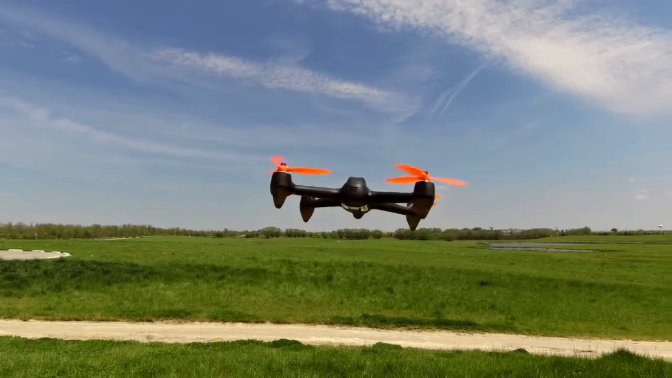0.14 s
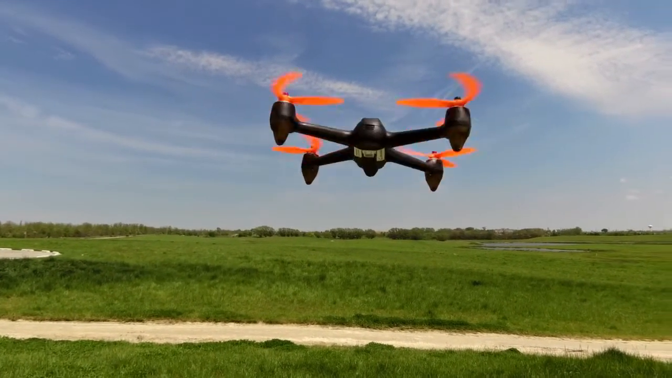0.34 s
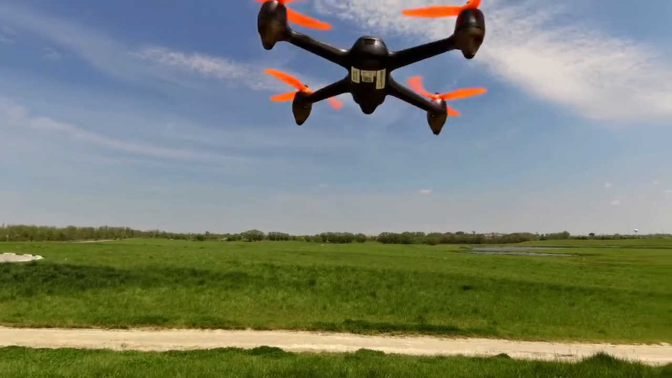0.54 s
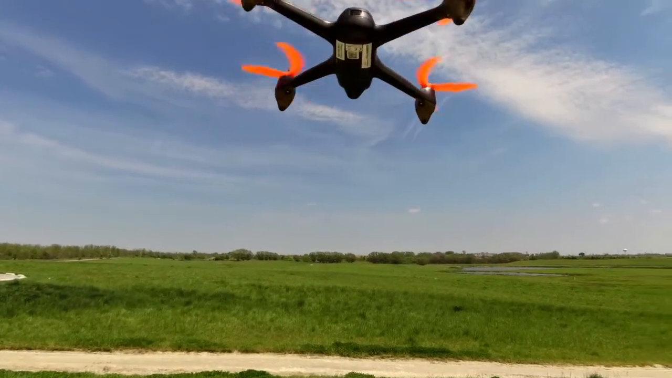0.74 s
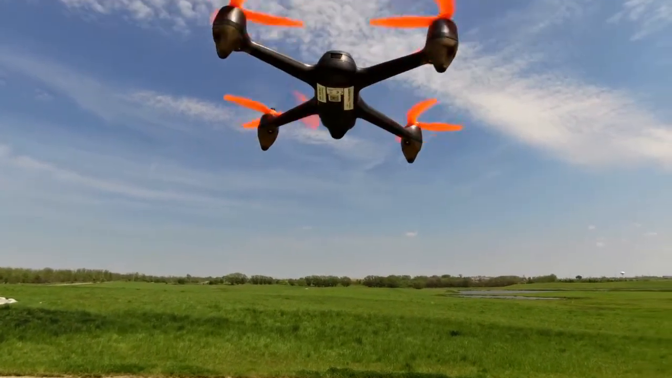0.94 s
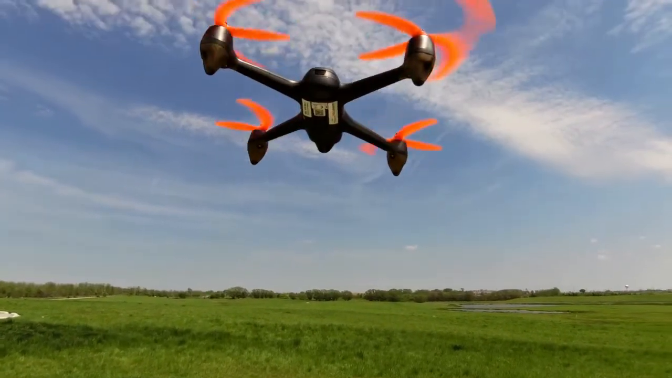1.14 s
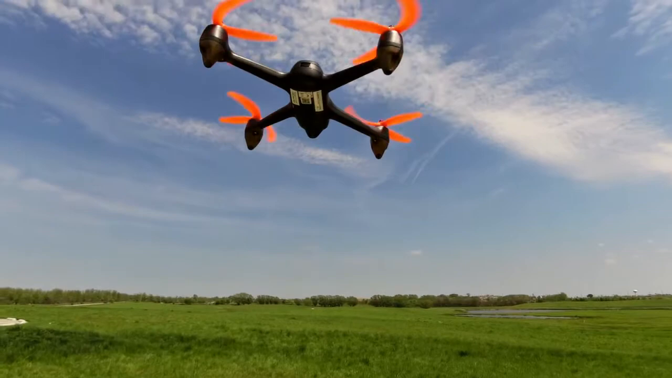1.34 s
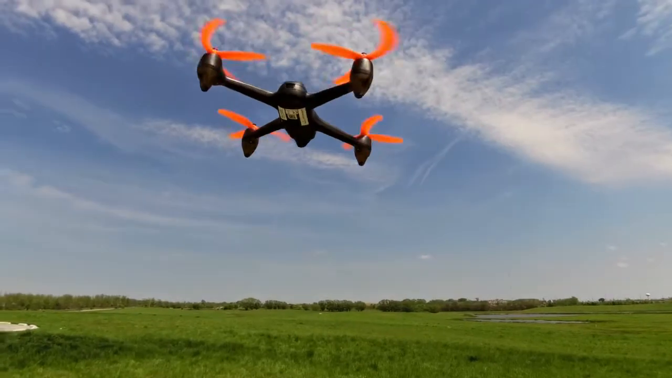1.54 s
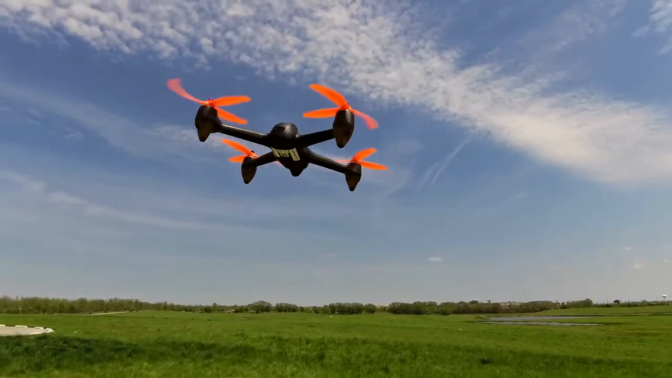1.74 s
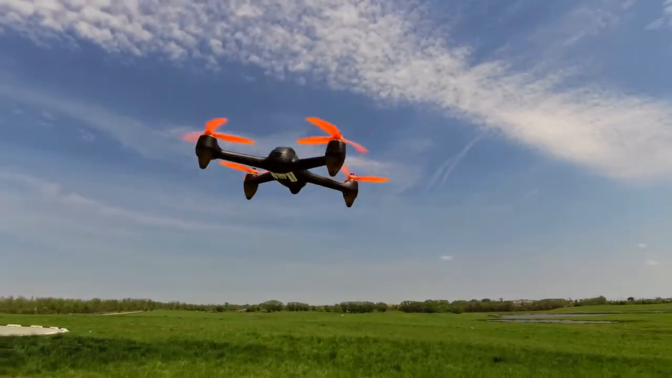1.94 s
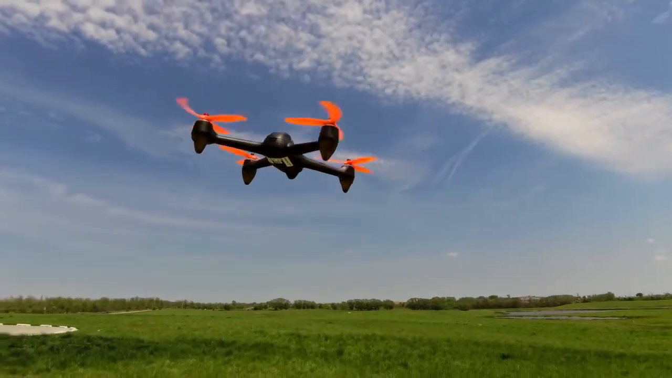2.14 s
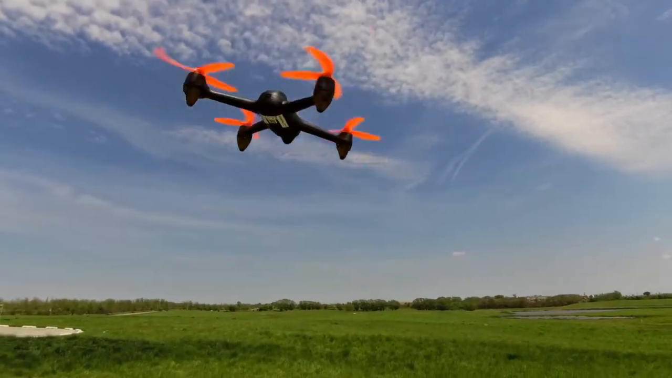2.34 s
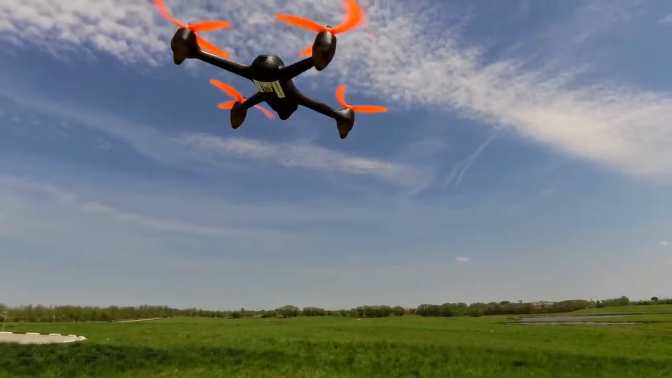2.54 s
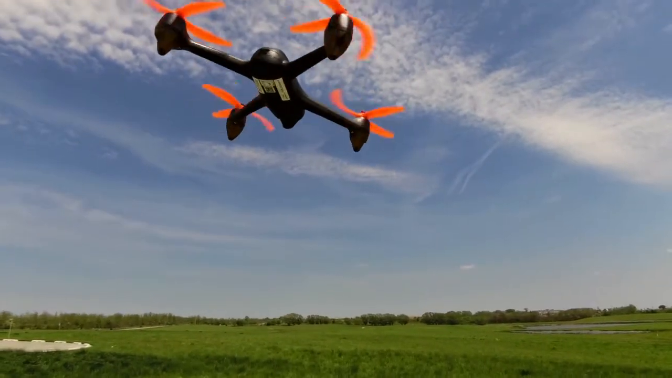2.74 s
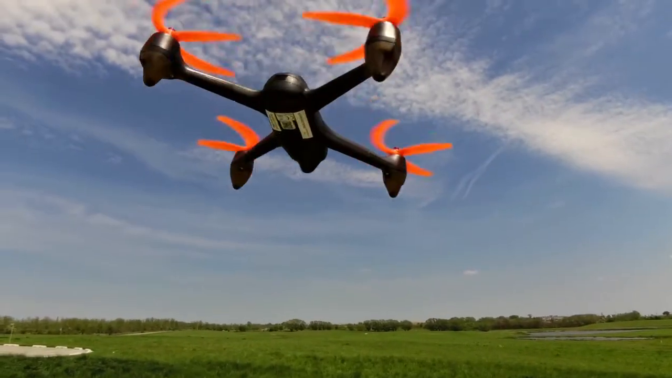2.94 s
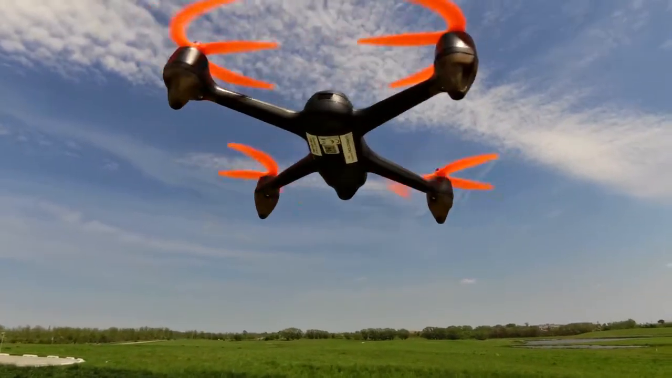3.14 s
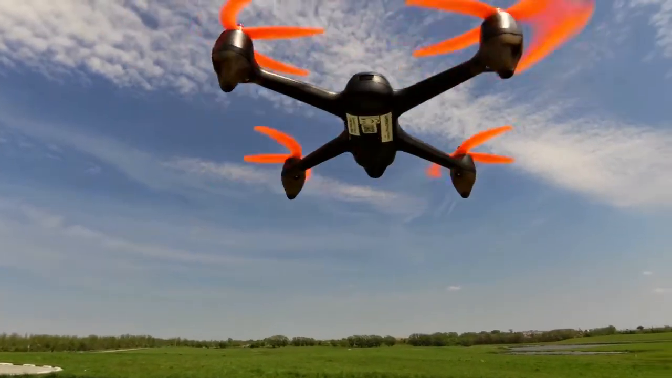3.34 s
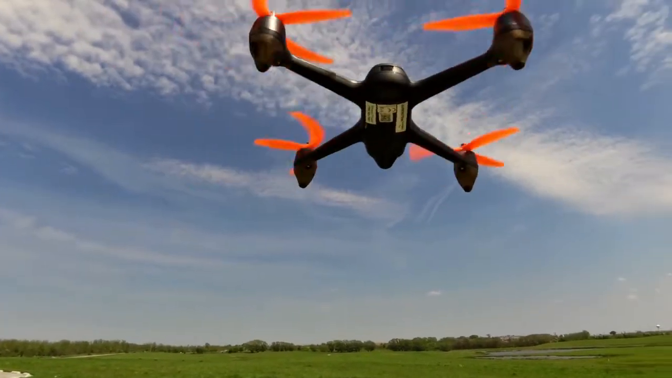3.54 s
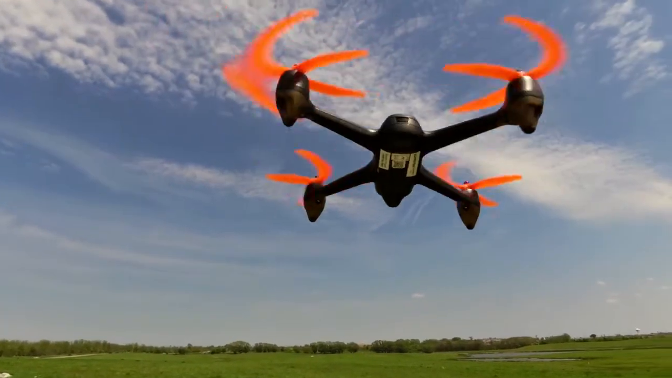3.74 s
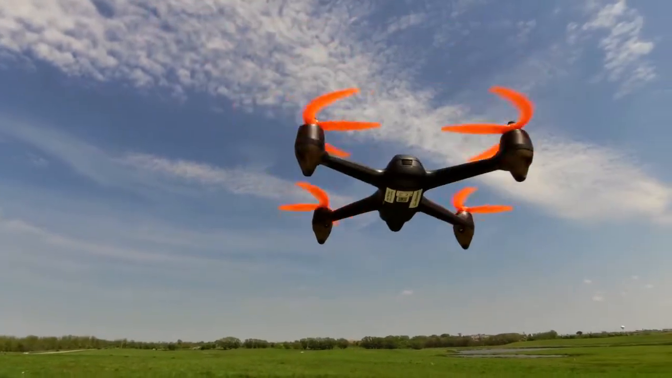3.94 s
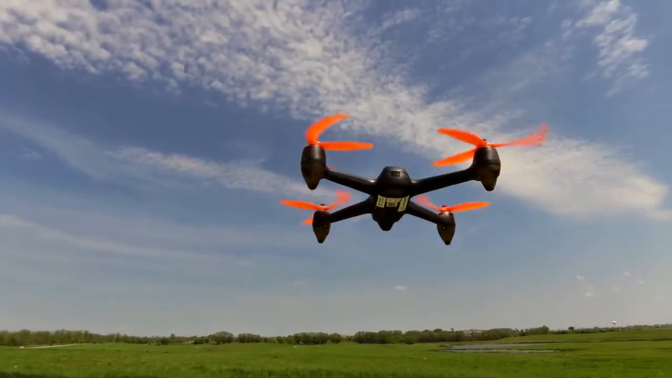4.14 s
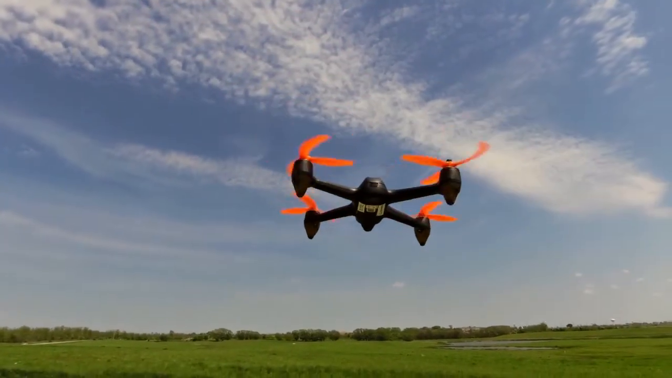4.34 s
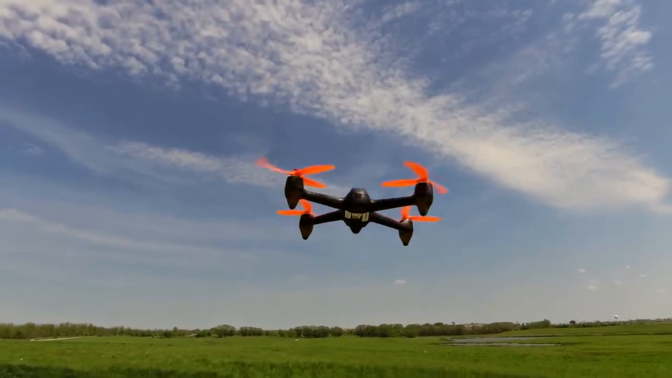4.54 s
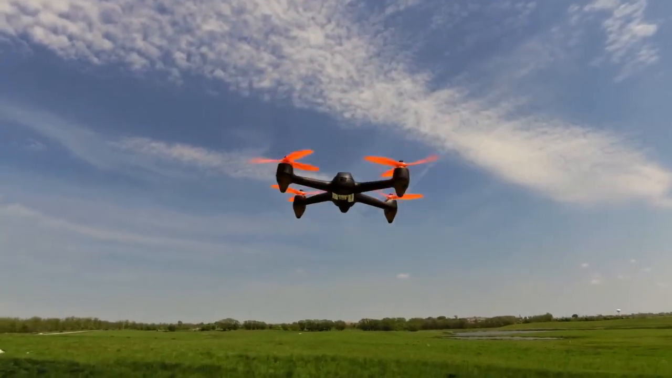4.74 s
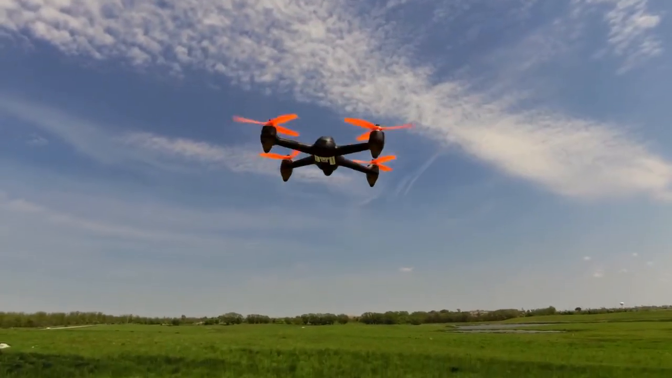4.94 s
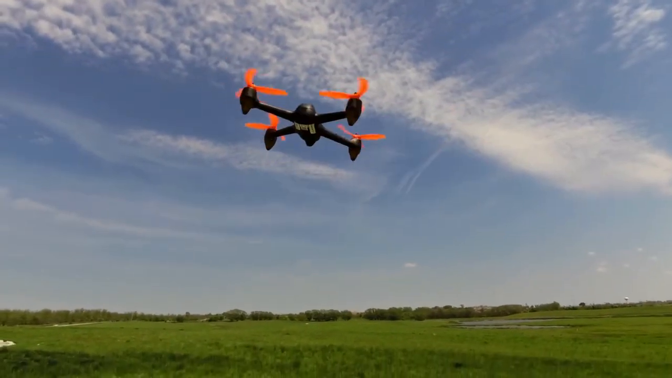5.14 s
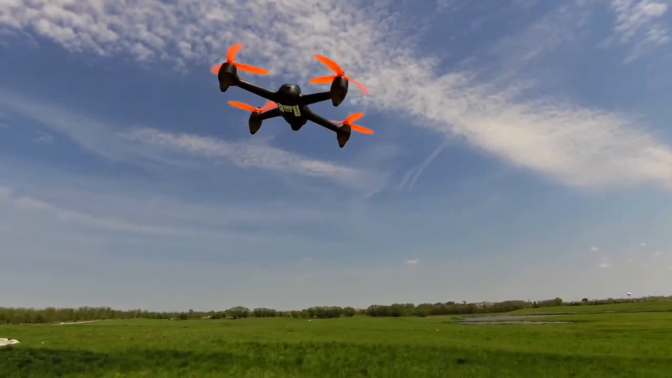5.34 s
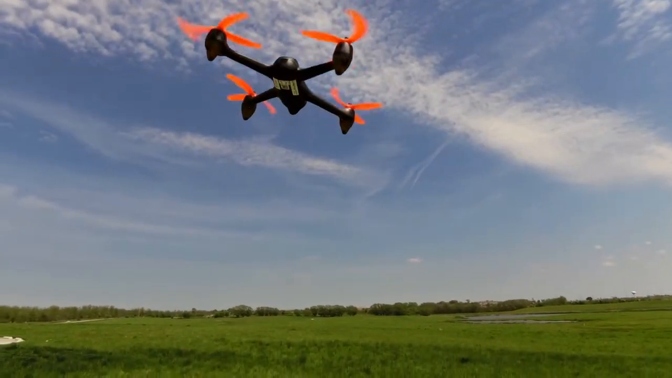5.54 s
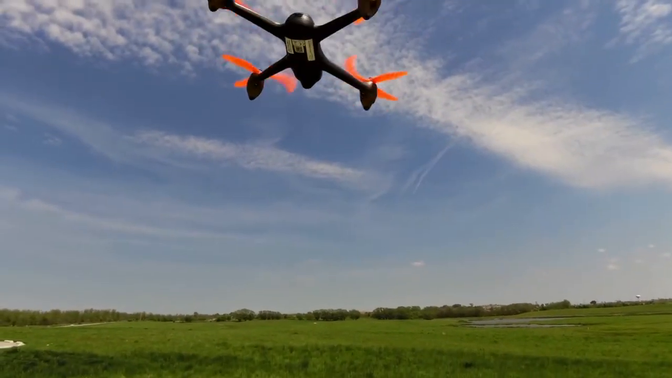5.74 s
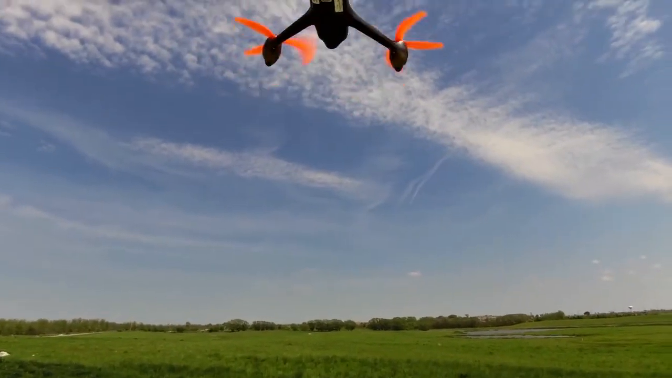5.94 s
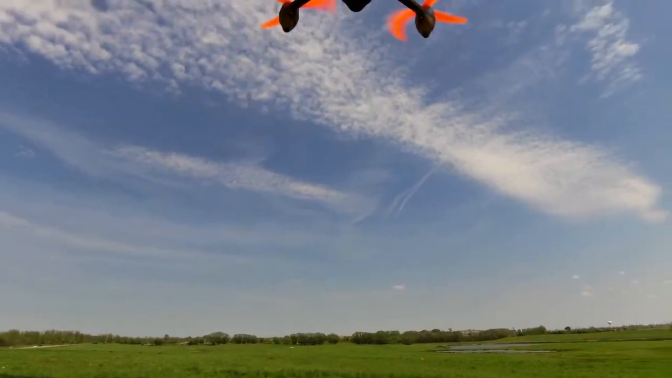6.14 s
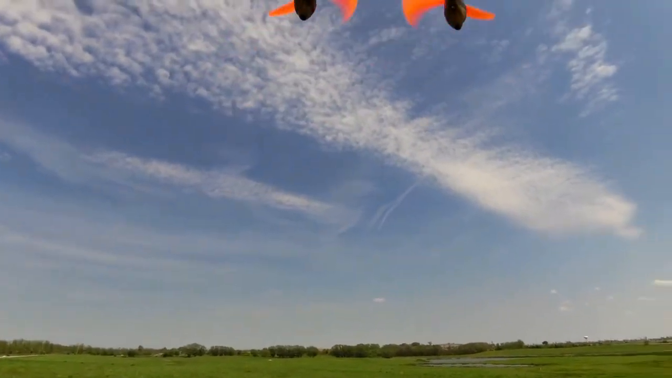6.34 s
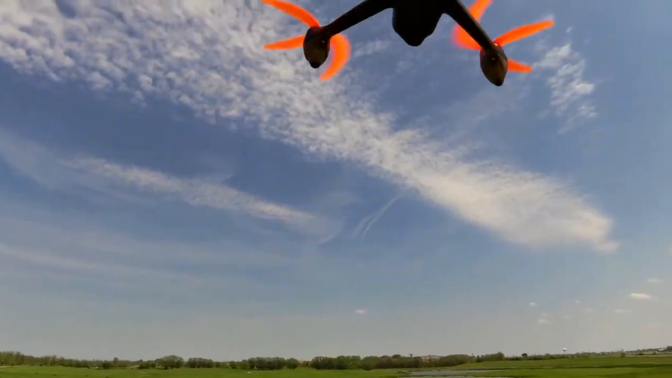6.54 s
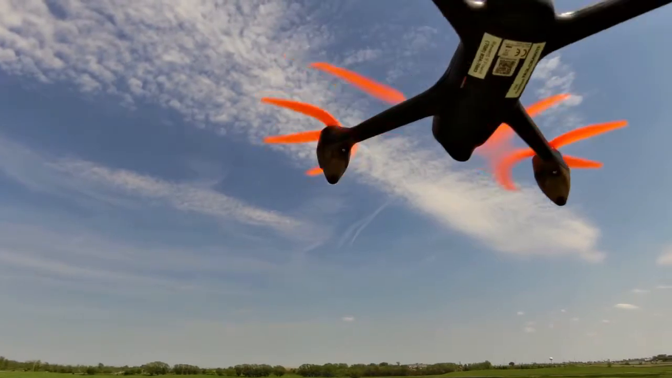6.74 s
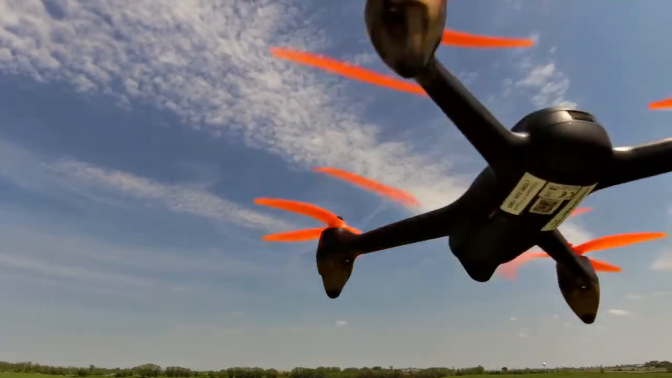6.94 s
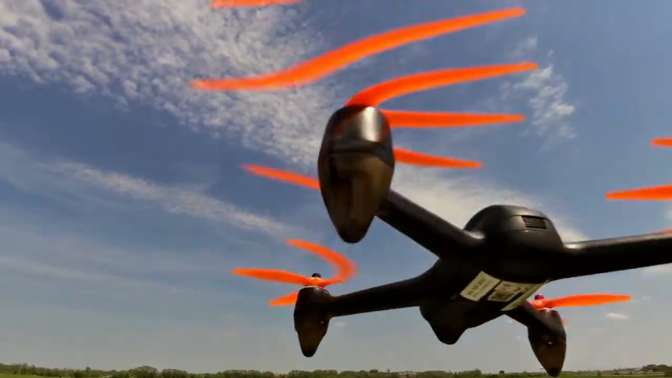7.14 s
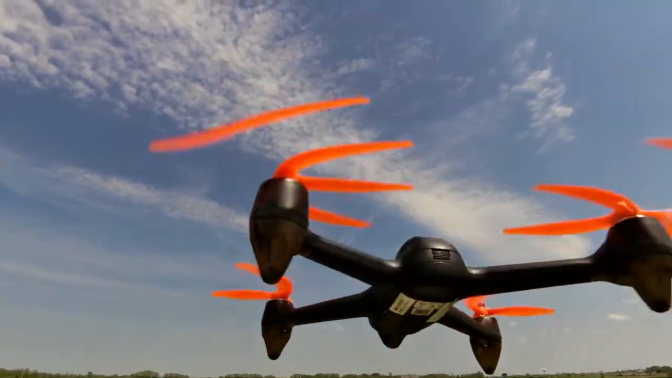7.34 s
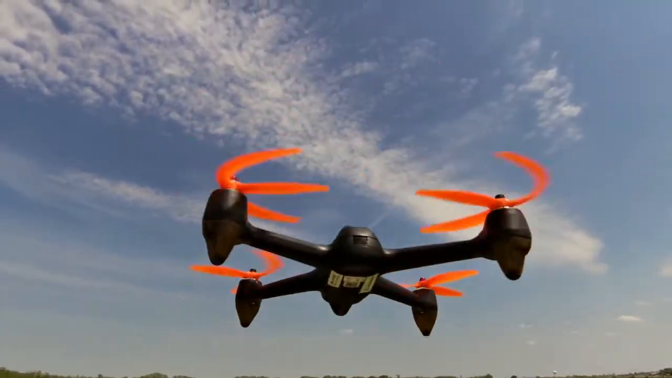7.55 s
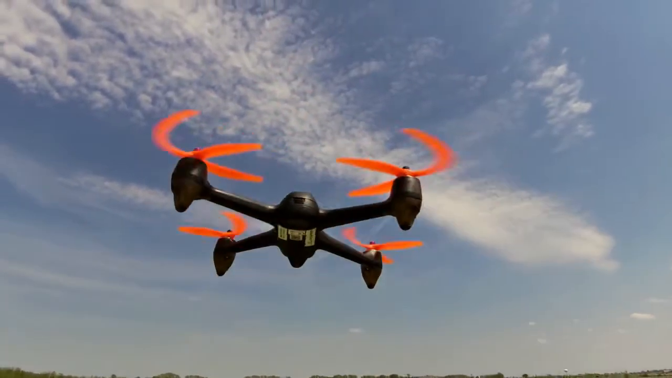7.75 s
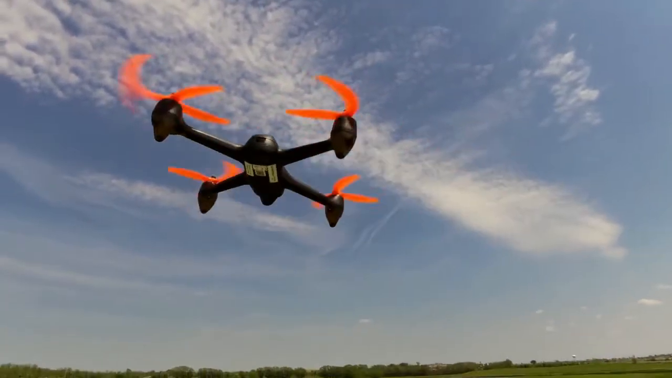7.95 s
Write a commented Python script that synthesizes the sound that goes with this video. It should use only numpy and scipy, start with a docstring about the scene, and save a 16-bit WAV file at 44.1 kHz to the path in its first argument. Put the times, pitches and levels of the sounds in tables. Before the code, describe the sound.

Outdoors, dry and close: a little quadcopter's rough buzz rises and dips in pitch, swelling as it drifts nearer and softening as it backs off. Rotor tones beat against each other under a rushing hiss and faint high whine. Small puffs bump the microphone early on. In the last second or so a low overhead pass brings brighter rasp, a rising whine and violent wind buffeting, then the buzz re-emerges.

```python
"""A small quadcopter hovers and sways close by over an open field, with light air on the microphone.
Four two-bladed rotors hum as sine overtones at slightly different speeds; the motors whine thinly.
Shaped noise makes the churn of the blades, the moving air and the faint sound of the field.
Gusts of prop wash brush the microphone now and then; a few single eddies thump it, with one tiny squeak.
Near the end the drone passes low overhead and its downdraught hits the microphone hard."""
import sys
import numpy as np
from scipy import signal
from scipy.fft import rfft, irfft, next_fast_len
from scipy.io import wavfile
from scipy.ndimage import uniform_filter1d

SR = 44100
rng = np.random.default_rng(int(sys.argv[2]) if len(sys.argv) > 2 else 0)


def transcribe(signal):
    """Save signal, clipped to [-1, 1], as a 16-bit WAV file at the path in sys.argv[1]."""
    frames = np.atleast_2d(signal).T
    limited = np.clip(frames, -1, 1)
    pcm = np.round(limited * 32767).astype(np.int16)
    wavfile.write(sys.argv[1], SR, pcm)


N = 352359


def from_db(db):
    """Turn decibels into a gain."""
    return 10 ** (np.asarray(db) / 20)


def rms_one(x):
    """Scale a signal to unit power."""
    return x / np.sqrt(np.mean(x ** 2) + 1e-20)


def in_time(rows):
    """Draw one curve per column after the time column, with a value for every sample."""
    seconds, *columns = np.transpose(rows)
    t = np.arange(N) / SR
    return [np.interp(t, seconds, column) for column in columns]


def on_log_axis(points, at):
    """Read a dB table between its points, along a logarithmic axis."""
    where, db = np.transpose(points)
    return np.interp(np.log(at), np.log(where), db)


def drift(rate):
    """Smooth random wandering of spread 1; a higher rate in Hz wanders faster."""
    step = 40  # samples between the computed points
    warm_up = 2000  # points dropped while the filter settles
    r = np.exp(-80 * np.pi * rate / SR)
    points = rng.standard_normal(N // step + 2 + warm_up)
    slow = signal.lfilter([1], [1, -2 * r, r * r], points)[warm_up:]
    return np.interp(np.arange(N) / step, np.arange(len(slow)), rms_one(slow))


def noise(spectrum):
    """Colour white noise with a spectrum table and scale it to unit power."""
    size = next_fast_len(N)
    hz = np.maximum(np.arange(size // 2 + 1) * SR / size, 1)
    white = rfft(rng.standard_normal(size))
    return rms_one(irfft(white * from_db(on_log_axis(spectrum, hz)), size)[:N])


def unbroken(x):
    """Even out the lulls and peaks of a turbulent flow, because eddies follow each other closely."""
    stream_s = .03  # the stream stays full over this time
    return x / np.sqrt(uniform_filter1d(x ** 2, int(stream_s * SR)) + 1e-9)


# Colour of the faint air of the field. Each row: pitch in Hz, relative level in dB per Hz.
FIELD_COLOUR = [(120, -31.5), (250, -0.5), (420, -15.5), (1090, -17.5), (3200, -34), (5000, -36.5),
                (5900, -38), (6500, -44.5), (7200, -48), (9000, -55), (12000, -65)]


def field_air():
    """Faint, steady noise stands for the air of the open field."""
    return from_db(-51) * noise(FIELD_COLOUR)


BREEZE_DB, BREEZE_SWING_DB = -46, 1.65  # light air that is always on the microphone
# the downdraught sweeps across once, as the drone passes above
PASS_S, PASS_DB = 7.49, -21
PASS_RISE_DB_PER_S, PASS_FALL_DB_PER_S = 40, 42
# Gusts of prop wash. Each row: moment of the peak in seconds, peak level in dB,
# length in seconds (the rise and the fall each fade by about 8.7 dB over it).
WASH_GUSTS = [(0.8, -37, 0.047), (1.448, -41, 0.094), (1.86, -32, 0.066), (2.162, -38.5, 0.24),
              (2.55, -45, 0.062), (3.125, -40, 0.041), (3.58, -40.5, .08), (4.303, -36.5, 0.11),
              (4.83, -43, 0.25), (5.481, -37.5, 0.027), (5.697, -39, 0.11), (5.91, -44, 0.047),
              (6.993, -28, 0.06), (7.151, -25.5, 0.039), (7.358, -18, 0.09), (7.564, -14.5, 0.074),
              (7.704, -23, 0.045), (7.806, -29, 0.056), (7.901, -32, 0.026)]


def air_stream():
    """Add the powers of breeze, gusts and sweeping downdraught, and give their level in dB."""
    t = np.arange(N) / SR
    power = from_db(BREEZE_DB + BREEZE_SWING_DB * drift(9.8)) ** 2
    below_peak_db = np.maximum(PASS_RISE_DB_PER_S * (PASS_S - t), PASS_FALL_DB_PER_S * (t - PASS_S))
    power += from_db(PASS_DB - below_peak_db) ** 2
    for s, peak_db, length_s in WASH_GUSTS:
        away = np.abs(t - s) / length_s
        power += (from_db(peak_db) * np.exp(-np.minimum(away, 20))) ** 2
    return 10 * np.log10(power)


# a hard stream sheds smaller eddies: the share of the rumble below this pitch that it loses
EDDY_HZ, THINNING = 75, .7
# Colour of the rumbling air. Each row: pitch in Hz, relative level in dB per Hz.
WIND_COLOUR = [(15, -28.5), (25, -22), (55, 3.5), (110, 3), (155, 1), (210, -3.5), (300, -8), (450, -14.5),
               (750, -30), (1300, -53.5), (2500, -55), (5000, -91)]
# Colour of fine turbulence at the microphone port. Each row: pitch in Hz, relative level in dB per Hz.
TORN_COLOUR = [(100, -12.5), (250, 9), (520, 5.5), (750, -7.5), (1400, -29.5), (2200, -43), (3500, -57)]


def prop_wash(lumpy_db, fine_db, steepness):
    """Air tumbles over the microphone as a lumpy rumble; stronger air sits higher and frays more."""
    wash_db = air_stream()
    force_db = wash_db - wash_db.max()
    rumble = rms_one(from_db(lumpy_db * drift(30)) * unbroken(noise(WIND_COLOUR)))
    deep = signal.sosfilt(signal.butter(1, EDDY_HZ, fs=SR, output="sos"), rumble)
    rumble = rumble - THINNING * from_db(force_db / 2) * deep
    frayed = rms_one(from_db(1.8 * drift(67)) * noise(TORN_COLOUR))
    fray_gain = from_db(fine_db + steepness * force_db)
    return from_db(wash_db) * (rumble + fray_gain * frayed)


# Colour of the air tearing inside an eddy. Each row: pitch in Hz, relative level in dB per Hz.
GRIT_COLOUR = [(100, -10), (300, 0), (700, -3), (1300, -16), (2100, -30), (3500, -50)]
# Single eddies that thump the microphone. Each row: moment in seconds, peak level in dB, pitch in Hz.
EDDY_THUMPS = [(1.800, -22, 190), (1.826, -26, 190), (1.837, -16.5, 160), (1.849, -24, 150),
               (1.861, -20, 140), (2.323, -30, 380), (4.210, -24, 140), (4.332, -18, 140),
               (4.347, -25, 130), (4.752, -30, 170), (7.089, -18, 150), (7.166, -19, 80), (7.272, -14, 150),
               (7.288, -13, 150), (7.332, -3.5, 125), (7.356, -16, 250), (7.369, -14, 120),
               (7.379, -13, 290), (7.386, -9, 140), (7.404, -14, 110), (7.445, -15, 220), (7.467, 0.5, 225),
               (7.509, -13, 140), (7.530, -15, 240), (7.546, -10, 190), (7.561, -6, 130), (7.574, -13, 170),
               (7.581, -19, 350), (7.620, -12, 100), (7.686, -21, 290), (7.701, -16, 170),
               (7.748, -24, 250), (7.803, -8.5, 140), (7.857, -25, 230), (7.912, -21, 90)]


def thumps(tearing):
    """An eddy swings the pressure once, with a trough on each side; tight, strong ones tear more."""
    out, t = np.zeros(N), np.arange(N) / SR
    grit = unbroken(noise(GRIT_COLOUR))
    for s, peak_db, hz in EDDY_THUMPS:
        near = np.abs(t - s) < .03  # seconds
        u = (np.pi * hz * (t[near] - s)) ** 2
        swing = (1 - 2 * u) * np.exp(-u)
        tear_gain = tearing * from_db(peak_db / 4) * (hz / 200) ** 2
        torn = tear_gain * grit[near] * np.exp(-u / 7)
        out[near] += from_db(peak_db) * (swing + torn)
    return out


def squeak(level_db):
    """A sine under a very short bell-shaped swell makes one tiny squeak."""
    middle_s, hz, length_s = 1.848, 3700, .0025
    t = np.arange(N) / SR - middle_s
    return from_db(level_db) * np.exp(-(t / length_s) ** 2) * np.sin(2 * np.pi * hz * t)


def port(wind):
    """Hard gusts overload the microphone port, which rounds their peaks and passes little treble."""
    top, dull_hz = 1.2, 2400
    rounded = top * np.tanh(wind / top)
    return signal.sosfilt(signal.butter(4, dull_hz, fs=SR, output="sos"), rounded)


def spin(blade_hz, hunt, flutter):
    """Blade phase: inertia rounds the speed changes, the flight controller keeps trimming them."""
    rounded_hz = uniform_filter1d(blade_hz, SR // 30)
    speed = rounded_hz * (1 + hunt * drift(4.03) + flutter * drift(42.0))
    return 2 * np.pi * (np.cumsum(speed) / SR + rng.random())


# Blade wakes smeared around the overtones. Each row: multiple of the blade-pass pitch, relative level in dB.
WAKE_LEVELS = [(2, -17), (3, -10), (4, -10.5), (5, -17.5), (6, -18.5)]


def wakes(phase, width_hz):
    """A blade cuts the same eddy several times, which makes narrow bands of noise on its overtones."""
    out = np.zeros(N)
    for k in range(2, 7):
        band = drift(width_hz) * np.sin(k * phase) + drift(width_hz) * np.cos(k * phase)
        out += from_db(on_log_axis(WAKE_LEVELS, k)) * band
    return out


# Colour of the rush of the blades. Each row: pitch in Hz, relative level in dB per Hz.
RUSH_COLOUR = [(120, -25), (220, 7), (380, -3.5), (640, 1.5), (850, -2), (1100, -3), (1450, -6.5),
               (1800, -15.5), (2500, -16.5), (3150, -26), (4200, -34.5), (6000, -51), (8000, -71)]
# Colour of the blade-tip hiss. Each row: pitch in Hz, relative level in dB per Hz.
HISS_COLOUR = [(2000, -12.5), (3100, -4.5), (3550, -0.5), (3850, -4), (4650, 0), (4900, 4.5), (5750, -1.5),
               (6150, -11.5), (6600, -21), (7400, -21), (8000, -33), (12000, -51)]
# Level of that hiss. Each row: time in seconds, dB against the drone's nearness level.
HISS_OVER_TIME = [(0, -27), (.5, -15), (1.1, -20), (3.3, -18.5), (4.1, -17), (4.5, -20), (6.2, -21),
                  (6.85, -18), (7.3, -12.5), (7.99, -22)]
# Colour of the ringing shell. Each row: pitch in Hz, relative level in dB per Hz.
SHELL_COLOUR = [(3400, -38.5), (3850, -15.5), (3990, 2), (4400, -0.5), (4650, -17), (5400, -56)]


def churn(phases, rush_db, shell_db, chop, gust_db):
    """Turbulence on the blades: a rush and a hiss, chopped as the blades pass; the shell rings along."""
    hiss_db = rush_db + in_time(HISS_OVER_TIME)[0]
    chopped = rms_one(1 + chop * sum(np.cos(p) for p in phases))
    # wakes of the leading rotor in each pair
    cut = .62 * wakes(phases[0], width_hz=45) + .75 * wakes(phases[2], width_hz=36)
    rush_gain = from_db(rush_db + gust_db * drift(18))
    rush = rush_gain * (from_db(3.0) * chopped * noise(RUSH_COLOUR) + cut)
    hiss = from_db(hiss_db + .5 * gust_db * drift(25)) * chopped * noise(HISS_COLOUR)
    return rush + hiss + from_db(shell_db) * noise(SHELL_COLOUR)


EDGE_DB, EDGE_GROWTH = -12.5, 1  # against the nearness level at its peak; further dB lost per dB of distance
# The sharp edge of the blade noise. Each row: pitch in Hz, relative level in dB per Hz.
EDGE_COLOUR = [(500, -29.5), (800, 1.5), (1100, -8), (1600, -3.5), (2700, -11), (3400, -19), (5400, -14.5),
               (6500, -38.5), (9000, -72)]


def blade_edge(rush_db):
    """Close by, the blades rasp more brightly, as an extra noise that grows faster than the rush."""
    return from_db(rush_db + EDGE_DB + EDGE_GROWTH * (rush_db - rush_db.max())) * noise(EDGE_COLOUR)


WHINE_ORDER = 14  # whine pitch as a multiple of the blade-pass pitch


def motor(phase, whine, flicker_db):
    """Magnetic cogging sings far above the blade tone; speed ripple smears part into a narrow rasp."""
    angle = WHINE_ORDER * phase
    whine_db, blur = in_time(whine)
    tone = from_db(flicker_db * drift(21)) * np.sin(angle)
    rasp = (drift(60) * np.sin(angle) + drift(60) * np.cos(angle)) / np.sqrt(2)
    return np.sqrt(2) * from_db(whine_db) * (np.sqrt(1 - blur) * tone + np.sqrt(blur) * rasp)


WAKE_SCATTER = .16  # how far gusty inflow shifts the sharp edge of a blade's pulse, in radians
# Upper overtones of a rotor. Each row: multiple of the blade-pass pitch, level in dB against the third.
ROTOR_OVERTONES = [(3, 0), (4, -5.5), (5, -9), (7, -16), (10, -21)]


def rotor(phase, hum_db, octave_db, third_db, uneven_db, rough):
    """Each blade sends out a pressure pulse; gusty inflow makes its overtones shiver and break up."""
    out = from_db(hum_db + uneven_db * drift(4.7)) * np.sin(phase)
    octave_gain = from_db(octave_db + uneven_db * drift(6.3))
    out += octave_gain * np.sin(2 * (phase + rough * drift(130)) - np.pi / 2)
    # the upper overtones share three independent fades in turn
    fades = [from_db(third_db + 4.5 * drift(11) - 1.8) for _ in range(3)]
    edge = phase + WAKE_SCATTER * drift(45)
    for k in range(3, 11):
        overtone = np.sin(k * edge - (k - 1) * np.pi / 2)
        out += from_db(on_log_axis(ROTOR_OVERTONES, k)) * fades[k % 3] * overtone
    return np.sqrt(2) * out


# the flight controller rocks the partner rotors' speed to hold the balance
HUNT_HZ, HUNT_SHARE = 7, .014
BALANCE_S = .14  # a quicker push than this on the fast leader is taken from its partner
PARTNER_WHINE_DB = -13  # the partner motor against the one that leads
SHELL_FOLLOWS = 0.063  # dB the shell gains per dB of its colour at the whine's pitch
# Throttle of the faster pair. Each row: time in seconds, blade-pass pitch in Hz.
FAST_THROTTLE = [(0, 283), (.3, 292), (.62, 273), (.72, 242), (.86, 215), (1.0, 274), (1.08, 285),
                 (1.17, 272), (1.26, 289), (1.55, 245), (1.78, 243), (2.03, 286), (2.32, 284), (2.6, 235),
                 (2.78, 245), (2.9, 239), (3.06, 294), (3.13, 279), (3.2, 291), (3.32, 274), (3.43, 274),
                 (3.65, 218), (3.93, 277), (4.0, 266), (4.09, 277), (4.36, 247), (4.78, 285), (5.04, 275),
                 (5.15, 252), (5.35, 246), (5.58, 275), (5.68, 272), (5.78, 287), (5.93, 287), (6.2, 272),
                 (6.36, 238), (6.5, 219), (6.64, 237), (6.695, 239), (6.73, 272), (6.86, 271), (6.93, 296),
                 (7.01, 293), (7.08, 275), (7.15, 290), (7.99, 278)]
# Throttle of the slower pair. Each row: time in seconds, blade-pass pitch in Hz.
SLOWER_THROTTLE = [(0, 255), (.3, 261), (.45, 269), (.56, 260), (.86, 205), (1.05, 256), (1.2, 272),
                   (1.55, 228), (1.78, 222), (2.0, 256), (2.35, 259), (2.6, 219), (2.9, 224), (3.06, 269),
                   (3.4, 261), (3.65, 207), (3.84, 256), (3.91, 257), (3.99, 271), (4.065, 255),
                   (4.13, 269), (4.21, 254), (4.265, 263), (4.33, 243), (4.38, 247), (4.43, 235),
                   (4.51, 247), (4.57, 251), (4.63, 262), (4.7, 260), (4.82, 267), (5.05, 255), (5.35, 228),
                   (5.8, 257), (6.12, 247), (6.25, 251), (6.5, 203), (6.88, 270), (7.27, 257), (7.45, 265),
                   (7.73, 254), (7.83, 266), (7.99, 250)]
# How near the drone sounds as it sways. Each row: time in seconds, base level in dB for rush and tones.
SWAY_NEARNESS = [(0, -56), (.5, -50), (.78, -50), (1.1, -42), (1.55, -48), (2.3, -50.5), (2.68, -51.5),
                 (2.9, -47.5), (3.12, -41.5), (3.36, -41), (3.65, -46), (3.95, -43.5), (4.45, -50.5),
                 (4.75, -49.5), (5.1, -53.5), (5.65, -52), (5.88, -46.5), (6.1, -44.5), (6.25, -47.5),
                 (6.57, -44.5), (6.78, -38), (7.2, -41), (7.7, -44), (7.99, -49.5)]
# Blade tones of the leading fast rotor, which the others follow more softly. Each row: time in seconds,
# then the fundamental, octave and third, in dB against the nearness level.
BLADE_TONES = [(0, 8, 4.5, 0.5), (.5, 2.5, 2.5, -17), (.66, 4, 5.5, -2), (.78, 9, 13, 1), (1.0, 6, -2, -11),
               (1.15, -0.5, 0, -12), (1.3, 4, 2.5, -13), (1.5, 6.5, -2.5, -5.5), (1.85, 6.5, -5, -12),
               (2.2, 5, 0, -6.5), (2.7, 6.5, 4, -6.5), (3.05, 4.5, 2, -8), (3.25, 5.5, 0.5, -7.5),
               (3.65, 10, -2, -6.5), (3.95, 6, 0, -14), (4.04, 0, -1.5, -15), (4.13, 11.5, 3, -5.5),
               (4.22, 9, -4, -6), (4.35, 10, 3.5, -6.5), (4.6, 9.5, -3.5, -10), (5.0, 4, 0, -10.5),
               (5.3, 8, 3.5, -2.5), (5.7, 1.5, 0.5, -6), (6.1, 1.5, -2, -9), (6.25, -8, -5, -2),
               (6.35, 1.5, -1, -13), (6.55, 5, -9.5, -16), (6.64, 8, -7, -14), (6.7, -4, -13, -5),
               (6.75, 10, -12, -12), (6.83, -2, -6, -13), (6.89, 8, 0, -6), (7.05, 3.5, -2.5, -5.5),
               (7.99, 4, -5.5, -16)]
# Ring of the shell. Each row: time in seconds, dB against the nearness level before the whine excites it.
SHELL_OVER_TIME = [(0, -17.5), (1.1, -23.5), (2.15, -17.5), (3.3, -20.5), (4.2, -27.5), (5, -23),
                   (6.1, -18.5), (6.95, -20), (7.3, -32), (7.99, -13)]
# Whine of the faster pair's leader. Each row: time in seconds, level in dB, share of rasp from 0 to 1.
FAST_MOTOR_WHINE = [(0, -77, .8), (.3, -71, .4), (.7, -86, .8), (1.0, -73, .5), (1.25, -66, .35),
                    (1.45, -82, .8), (1.9, -82, .6), (2.03, -71, .2), (2.3, -71, .2), (2.45, -86, .8),
                    (3.0, -80, .6), (3.06, -60.5, .05), (3.11, -66, .2), (3.2, -60.5, .08), (3.28, -68, .3),
                    (3.5, -80, .8), (5.68, -84, .8), (5.78, -68.5, .1), (5.84, -76, .4), (5.9, -69.5, .15),
                    (5.98, -78, .6), (6.2, -77, .6), (6.8, -70, .4), (6.87, -60, .05), (6.93, -52, .02),
                    (7.01, -55, .05), (7.08, -68, .4), (7.13, -57, .08), (7.24, -63, .2), (7.35, -72, .8),
                    (7.99, -82, .8)]
# Whine of the slower pair's leader. Each row: time in seconds, level in dB, share of rasp from 0 to 1.
SLOW_MOTOR_WHINE = [(0, -73.5, .6), (.48, -71.5, .6), (.65, -88, .8), (1.2, -72, .5), (1.5, -88, .8),
                    (3.65, -84, .4), (3.76, -67.5, .08), (4.0, -67.5, .1), (4.37, -73, .2), (4.43, -86, .3),
                    (4.49, -73, .15), (4.62, -71.5, .15), (4.9, -76, .4), (5.3, -92, .8), (5.8, -80, .8),
                    (6.1, -68, .6), (6.35, -80, .8), (7.15, -76, .6), (7.28, -65, .4), (7.45, -70, .7),
                    (7.66, -67.5, .5), (7.74, -64, .3), (7.99, -82, .6)]


def drone():
    """In each pair one rotor leads and its partner wanders around it, so their tones split and beat."""
    fast_hz, slow_hz = in_time(FAST_THROTTLE)[0], in_time(SLOWER_THROTTLE)[0]
    near_db = in_time(SWAY_NEARNESS)[0]
    hunt_depth = HUNT_SHARE * (1 + .5 * drift(2.22))
    hunting = hunt_depth * np.sin(2 * np.pi * HUNT_HZ * np.arange(N) / SR + drift(1.97))
    tones_db = near_db + np.array(in_time(BLADE_TONES))
    resonance_db = SHELL_FOLLOWS * on_log_axis(SHELL_COLOUR, WHINE_ORDER * fast_hz)
    shell_db = near_db + in_time(SHELL_OVER_TIME)[0] + resonance_db

    push_hz = fast_hz - uniform_filter1d(fast_hz, int(BALANCE_S * SR))
    fast = spin(fast_hz, hunt=.002, flutter=.002)
    fast_partner = spin((.975 + hunting) * fast_hz - 2 * push_hz, hunt=.012, flutter=.004)
    slow = spin(slow_hz, hunt=.001, flutter=.0035)
    slow_partner = spin((.98 - hunting) * slow_hz, hunt=.025, flutter=.005)

    hum = rotor(fast, *tones_db, uneven_db=.9, rough=.17)
    hum += rotor(fast_partner, *(tones_db - [[16], [8], [2]]), uneven_db=1.5, rough=.14)
    hum += rotor(slow, *(tones_db - 18.5), uneven_db=-1.0, rough=0.35)
    hum += rotor(slow_partner, *(tones_db - 20.0), uneven_db=8.5, rough=0.1)

    whine = motor(fast, FAST_MOTOR_WHINE, flicker_db=2) + motor(slow, SLOW_MOTOR_WHINE, flicker_db=2.3)
    partner_whine = motor(fast_partner, FAST_MOTOR_WHINE, flicker_db=3)
    partner_whine += motor(slow_partner, SLOW_MOTOR_WHINE, flicker_db=3)
    whine += from_db(PARTNER_WHINE_DB) * partner_whine

    phases = [fast, fast_partner, slow, slow_partner]
    edge = blade_edge(near_db)
    return hum + whine + edge + churn(phases, near_db, shell_db, chop=0.15, gust_db=1.0)


def scene():
    """Add the field, the wind on the microphone, the squeak and the drone; nothing reflects out here."""
    eddies = thumps(tearing=.18)
    wind = port(prop_wash(lumpy_db=1.5, fine_db=-13.5, steepness=0.18) + eddies)
    return (field_air() + wind + squeak(level_db=-53) + drone())[None]


CUTOFF_HZ = 12400  # the microphone passes almost nothing above this


def record(dry):
    """The microphone sheds the deepest rumble and adds a faint hiss; the top is cut."""
    heard = signal.sosfilt(signal.butter(2, 22, "high", fs=SR, output="sos"), dry)
    heard = heard + from_db(-89.5) * rng.standard_normal(N)
    return signal.sosfilt(signal.ellip(10, .1, 80, CUTOFF_HZ, fs=SR, output="sos"), heard)


dry = scene()
out = record(dry)
transcribe(out)
```